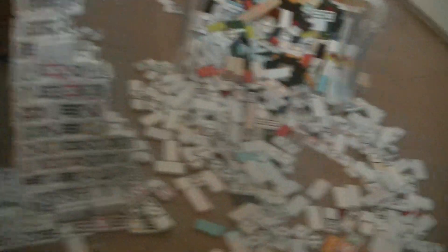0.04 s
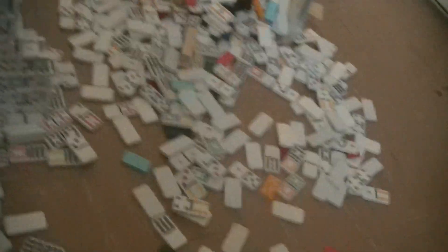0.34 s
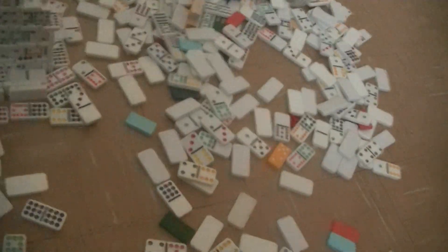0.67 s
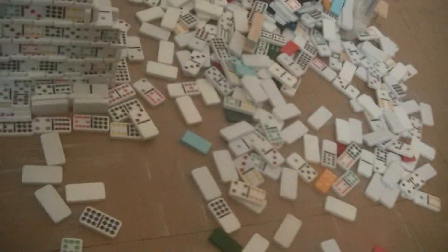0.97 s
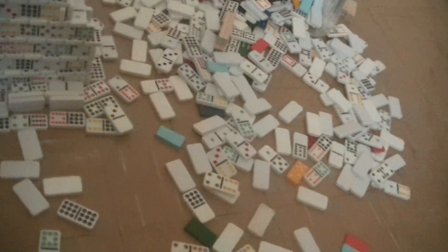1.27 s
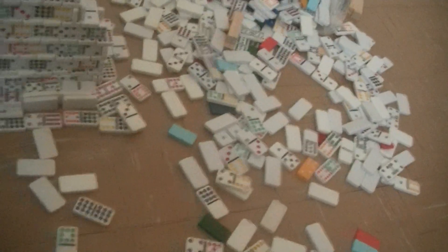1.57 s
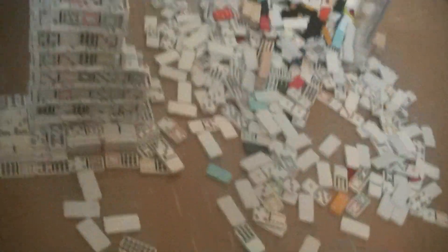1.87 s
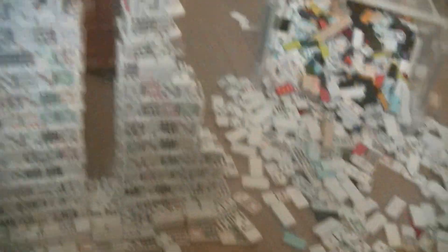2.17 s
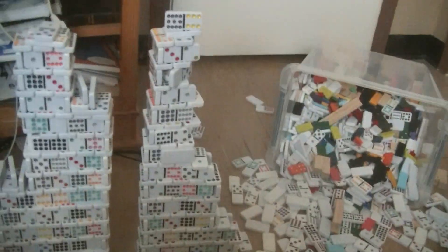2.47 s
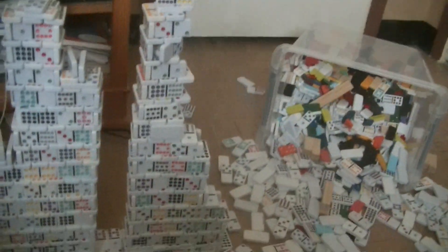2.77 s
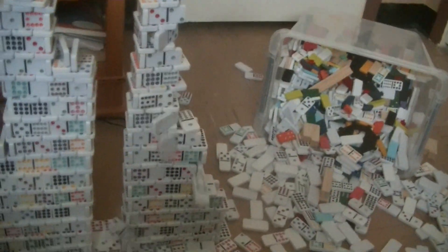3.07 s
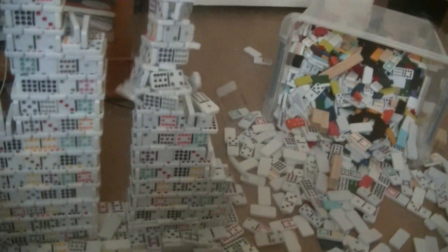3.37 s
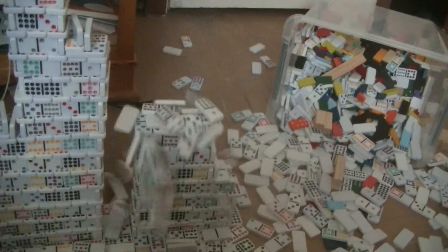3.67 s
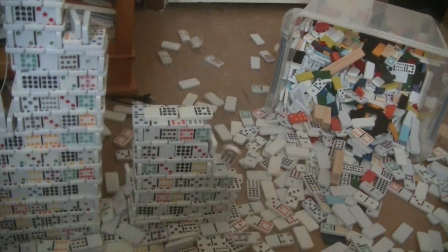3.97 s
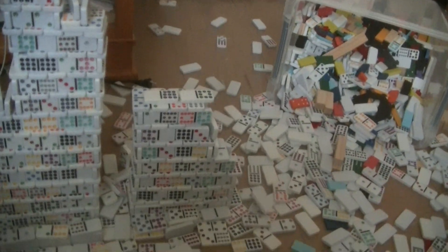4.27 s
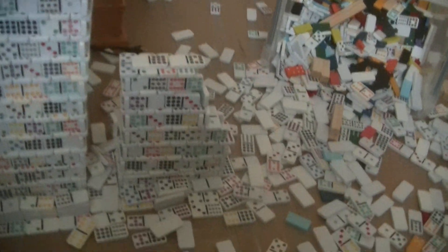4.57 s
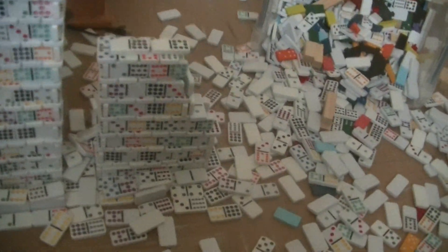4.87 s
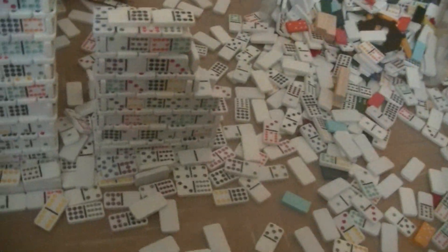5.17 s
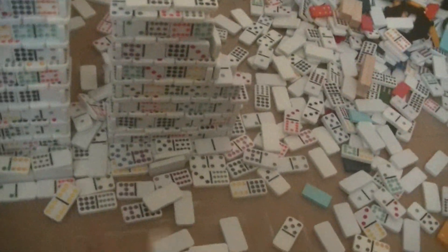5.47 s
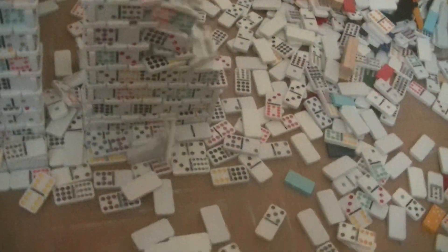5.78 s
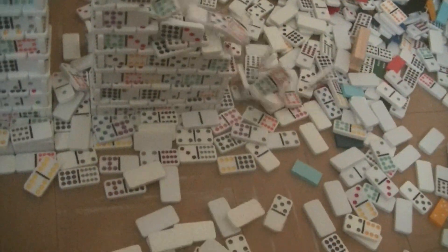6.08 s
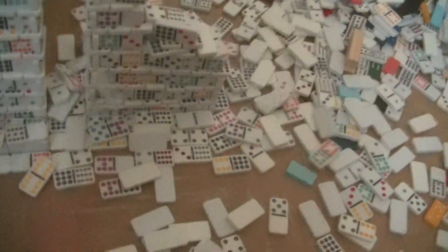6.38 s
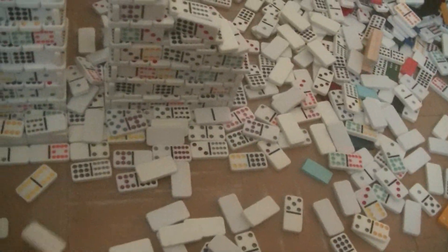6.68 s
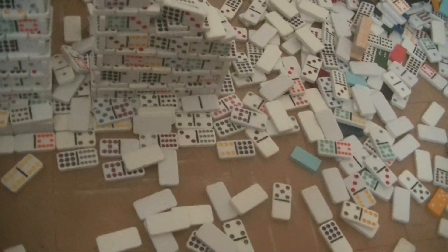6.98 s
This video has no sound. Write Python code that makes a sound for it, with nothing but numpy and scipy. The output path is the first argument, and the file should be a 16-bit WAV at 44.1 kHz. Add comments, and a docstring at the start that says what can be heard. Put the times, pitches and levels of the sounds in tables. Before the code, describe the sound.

Loose plastic dominoes drop and bounce on a wooden floor, each with a sharp clack and a thin ring, a few landing on something hollow. After a pause, a tower collapses in a dense clatter of colliding tiles. Faint taps and a short slide follow, then a sharp blow sets off a second collapse with a last small spill. The microphone is close and hand-held in a small, echoing room.

```python
"""Hard plastic dominoes fall on a wooden floor in a small, echoing room, close to a hand-held camera.
Loose tiles drop and bounce, each with a sharp clack and a thin ring; a few land on something hollow.
Then two towers give way, each in a dense clatter of colliding tiles; a blow sets the second humming first.
Faint dull taps and one short slide fall in the pauses, over quiet room air and soft thuds of a hand
on the camera. A limiter turns down the sharpest clacks."""
import sys
import numpy as np
from scipy import signal
from scipy.fft import rfft, irfft, next_fast_len
from scipy.io import wavfile
from scipy.ndimage import uniform_filter1d, minimum_filter1d

SR = 44100
rng = np.random.default_rng(int(sys.argv[2]) if len(sys.argv) > 2 else 0)


def master_out(mix):
    """Clip the mix to full scale and print it as 16-bit PCM to the path in sys.argv[1]."""
    frames = np.transpose(np.atleast_2d(mix))
    ceiling = np.clip(frames, -1, 1)
    pcm = np.round(ceiling * 32767).astype(np.int16)
    wavfile.write(sys.argv[1], SR, pcm)


N = 310464

# The tone of the quiet room. Each row: frequency in Hz, relative level in dB.
AIR_TONE = [(15, -38.5), (25, -18), (119, -6.5), (152, -8.5), (233, -2.5), (537, -12.5), (684, -20.5),
            (945, -16), (1140, -22), (1620, -15.5), (1750, -13.5), (7700, -14.5), (15500, -28)]
# How alike the air is in left and right. Each row: frequency in Hz, likeness (1 is identical).
AIR_LIKENESS = [(60, 0.14), (300, 0.18), (2000, 0.09), (8000, 0.21)]
# Faint dull taps. Each row: start in seconds, peak level in dB.
TAP_HITS = [(0.076, -39), (2.219, -37.5), (2.254, -46), (4.726, -35), (4.836, -35), (4.888, -45),
            (4.952, -30.5), (5.045, -36), (5.217, -27), (5.339, -39)]
# The tone of a tap. Each row: frequency in Hz, relative level in dB.
TAP_TONE = [(150, -9.5), (400, -29), (700, 0.5), (1100, -5), (2000, 2), (4800, 1), (7000, -27),
            (14000, -35)]
# How long the room echoes. Each row: frequency in Hz, seconds to fade by 60 dB.
ECHO_FADE = [(200, 0.28), (530, 0.42), (1400, 0.29), (3700, 0.34), (7000, 0.25), (13000, 0.24)]
# The echo's tone, where the room's low notes stand out. Each row: frequency in Hz, gain in dB.
ECHO_TONE = [(60, -8), (120, -1), (155, 7), (190, 3), (220, -2.5), (290, 5), (480, -3.5), (1000, -2.5),
             (2500, -2.5), (7000, -1.5), (14000, 1)]
# How alike the echo is in left and right. Each row: frequency in Hz, likeness (1 is identical).
ECHO_LIKENESS = [(60, 0.05), (130, 0.19), (290, 0.76), (640, 0.87), (1410, 1), (3100, 0.81), (6820, 0.71),
                 (15000, 0.72)]
# The hand shifts on the camera. Each row: start in seconds, relative level in dB.
HAND_BUMPS = [(0.2, -55.5), (1.82, -57), (2.19, -63)]
# The clearest tile strikes. Each row: start in seconds, level in dB, brightness in Hz,
# amount of floor knock (higher is boomier), relative echo level in dB.
TILE_STRIKES = [(.368, -4.5, 5060, 3, -2), (.463, -16.5, 5000, 15, 1.5), (.481, -11.5, 4660, 19, 2.5),
                (0.507, -11, 5470, 23, 0), (.525, 5.5, 4810, 16, -9), (0.535, 7.5, 4890, -3, -14),
                (0.5596, 1.5, 5360, -8, -9.5), (.591, -1, 5400, -13, -7), (.599, 7, 5040, 1, -7),
                (0.6379, -6.5, 5530, 8, 7), (0.7487, 4.5, 5050, 13, -6), (.8547, -6, 4500, 8, 3.5),
                (0.8624, -0.5, 5040, -8, -7), (.963, -6, 5740, 17, 5.5), (0.979, 0, 6080, 26.5, -18),
                (.994, 3, 5000, 18.5, -2), (1.035, 3, 6160, 6, -9.5), (1.041, -1, 6280, 15, -1),
                (1.125, -9, 4720, 11, -1), (1.1347, -2.5, 5780, 5, -9), (1.1395, 2.5, 6200, 7.5, 2.5),
                (1.256, -0.5, 5700, -6, 0), (1.2647, -2.5, 6500, 6.5, 4.5),
                (1.3426, -4.5, 5000, 13.5, -2.5), (1.441, 3, 3490, -13.5, -1.5),
                (1.468, -0.5, 5700, -10, 4.5), (1.515, -9, 4850, -14, -2), (1.5895, -14.5, 4880, -2, 3),
                (1.6471, -19, 4650, 18, 9), (2.8304, -15, 7080, -7, 5), (2.845, -10.5, 7180, -4, -4.5),
                (3.055, 10, 5080, -13, -10), (3.067, 3, 7230, -13, -1.5), (3.114, 1, 7280, -11, 0),
                (3.1968, 6, 4350, 0, -14), (3.2453, 7, 6930, 27, -14.5), (3.308, 5.5, 6350, -0.5, -3.5),
                (3.6193, 2, 4380, 14.5, 2), (3.657, 6.5, 5310, 8, -4), (3.7802, 7, 7000, -9, -9.5),
                (4.183, -3, 5400, 14.5, 5.5), (4.3645, -3.5, 6800, 7, -5), (4.38, 1, 6770, 5, -9),
                (4.406, -2.5, 6770, -7, -8.5), (4.4206, 4.5, 6980, -9, -13), (4.459, -11.5, 4700, -10, -10),
                (4.494, -14.5, 4600, -8, -13), (5.642, 10, 6000, 9, -6), (5.684, 3.5, 5350, -2, 0.5),
                (5.701, -2, 6700, -2, 0.5), (5.7578, 4.5, 5000, -9, 0), (5.8131, 12.5, 6500, 16, -22),
                (5.8417, 5.5, 4850, 10.5, -5.5), (5.927, 8.5, 5190, 5, -20.5), (5.937, 4, 6800, -2, -14),
                (5.975, 5, 4750, -14, -8.5), (6.0614, 8, 6690, 16, -14), (6.077, 11, 6720, -21, -13),
                (6.193, 11.5, 6820, -7, -15), (6.2784, 0, 6650, 21, 3), (6.327, 5.5, 4930, 7, -1),
                (6.493, 10, 5300, -13, -8), (6.579, 2.5, 4600, 3, 4.5), (6.6562, 6.5, 5050, 17, -9),
                (6.671, 5, 4900, -8, -4.5), (6.751, 11.5, 5600, 11, -6)]
# The basic tone of a clack. Each row: frequency in Hz, relative level in dB.
CLACK_TONE = [(59, -71.5), (100, -25.5), (188, -24.5), (487, -27), (758, -21.5), (1130, -22.5), (2370, -7),
              (3120, -6), (5070, 1.5), (6390, -2), (6810, -2.5), (7560, -9.5), (8410, -6.5), (10400, -20.5),
              (15500, -31)]
# Tiles land on something hollow. Each row: start in seconds, relative level in dB.
HOLLOW_HITS = [(1.302, -27.5), (1.342, -15.5), (1.44, -12.5), (1.47, -12), (1.515, -19.5), (1.589, -21.5),
               (1.632, -20), (1.648, -19.5)]
# The notes of that hollow space. Each row: pitch in Hz, width in Hz, relative level in dB.
HOLLOW_NOTES = [(1604, 165, 3), (1750, 141, 1)]
# Two towers fall, then a last short spill. Each row: start in seconds, seconds of pouring,
# seconds of running out, relative level in dB, typical ring pitch of the tiles in Hz.
FALLS = [(3.07, 1.06, .38, -13.5, 7050), (5.76, .72, .44, -15, 6800), (6.75, .11, .055, -13.5, 7620)]
# The tone of a sliding tile. Each row: frequency in Hz, relative level in dB.
SLIDE_TONE = [(350, -49), (600, -28), (1190, -30), (2800, -14), (3460, -18.5), (5070, -6.5), (7340, -24.5),
              (9060, -22), (14000, -61)]
# The notes of the struck stack. Each row: pitch in Hz, level in dB, seconds to fade by 60 dB.
STACK_NOTES = [(190, -47.5, 1.4), (1300, -39.5, 0.33), (15500, -36.5, .3)]
# The two microphones differ in level. Each row: frequency in Hz, left minus right in dB.
MIC_BALANCE = [(60, 4), (110, -1), (200, -2.5), (380, 0), (700, 0), (1290, 1), (2380, -0.5), (4400, 1),
               (8120, -7), (15000, 1)]
# Short waves reach them out of step. Each row: frequency in Hz, left minus right phase in radians.
MIC_PHASE = [(7000, 0.11), (9000, 1.13), (12000, 0.35), (15000, 2.3)]


def amp(db):
    """Turn decibels into a number to multiply by."""
    return 10 ** (np.asarray(db) / 20)


def unit(x):
    """Scale a sound to an average (rms) level of 1."""
    return x / np.sqrt(np.mean(x ** 2) + 1e-20)


def along(points, hz):
    """Read between the rows of a (frequency, value) table, with octaves evenly spaced."""
    freqs, values = np.transpose(points)
    return np.interp(np.log(hz + 1), np.log(freqs + 1), values)


def filtered(x, response):
    """Change a sound's tone: response(hz) gives the gain at each frequency."""
    n = x.shape[-1]
    padded = next_fast_len(n + SR // 10)
    return irfft(rfft(x, padded) * response(np.fft.rfftfreq(padded, 1 / SR)), padded)[..., :n]


def add(track, start_s, sound):
    """Mix a sound into a track at a given time."""
    start = max(round(start_s * SR), 0)
    part = track[start:start + len(sound)]
    part += sound[:len(part)]


def stereo_noise(n, likeness):
    """Noise at two microphones, as alike as the likeness table says."""
    angle = lambda hz: np.arccos(np.clip(along(likeness, hz), -1, 1)) / 2
    shares = lambda hz: np.array([np.cos(angle(hz)), np.sin(angle(hz))])
    mid, side = filtered(rng.standard_normal((2, n)), shares)
    return np.array([mid + side, mid - side])


def room_air(level_db=-58.5):
    """The quiet room makes a soft, steady hush."""
    noise = stereo_noise(N, AIR_LIKENESS)
    return amp(level_db) * unit(filtered(noise, lambda hz: amp(along(AIR_TONE, hz))))


def contact_pulses(tone_db, size=1024, swell_hz=5200, swell_width_hz=2400):
    """A contact makes a sudden pulse, here of peak 1, with the tone that tone_db(hz) gives."""
    hz = np.fft.rfftfreq(size, 1 / SR)
    # pack the energy at the front of the pulse without changing its tone (minimum phase)
    cepstrum = irfft(np.log(amp(np.maximum(tone_db(hz), -70))))
    cepstrum[..., 1:size // 2] *= 2
    cepstrum[..., size // 2 + 1:] = 0
    # the band near swell_hz lags a little, so a pulse swells over two or three cycles
    resonance = swell_hz ** 2 - hz ** 2 + 1j * hz * swell_width_hz
    wave = irfft(np.exp(rfft(cepstrum)) * np.conj(resonance) / resonance)
    return wave / np.abs(wave).max(-1, keepdims=True)


def dull_taps(rock_db=-7, rock_s=0.00262):
    """Soft contacts have little treble and no ring; the tile rocks once after each."""
    track = np.zeros(N)
    pulse = contact_pulses(lambda hz: along(TAP_TONE, hz))
    for start, db in TAP_HITS:
        add(track, start, amp(db) * pulse)
        add(track, start + rock_s * rng.uniform(0.33, 1), amp(db + rock_db) * pulse)
    return track


def room_echo(sound, tail_db=3, tail_rise_s=0.0035, near_db=-5, near_rise_s=0.00078, near_fade_s=0.013):
    """Sound from one spot scatters quickly off the floor and heaps, then lingers between the walls."""
    n = SR // 2
    t = np.arange(n) / SR
    hz, times, bands = signal.stft(stereo_noise(n, ECHO_LIKENESS), SR, nperseg=256)
    fade = amp(-60 * times / along(ECHO_FADE, hz)[:, None])
    tail = signal.istft(bands * fade, SR, nperseg=256)[1][:, :n]
    tail = unit(tail * (1 - np.exp(-t / tail_rise_s)))
    tail = filtered(tail, lambda hz: amp(along(ECHO_TONE, hz)))
    near_shape = amp(-60 * t / near_fade_s) * (1 - np.exp(-t / near_rise_s))
    near = unit(stereo_noise(n, ECHO_LIKENESS) * near_shape)
    response = (amp(tail_db) * tail + amp(near_db) * near) / np.sqrt(n)
    return signal.oaconvolve(sound[None], response, axes=1)[:, :N]


def hand_thuds(gain_db=-2.5, rise_s=.018, rumble_hz=65):
    """A shifting hand sends low, soft thuds through the camera's body."""
    loudness, t = np.zeros(N), np.arange(SR // 4) / SR
    for start, db in HAND_BUMPS:
        add(loudness, start, amp(db + gain_db) * t / rise_s * np.exp(1 - t / rise_s))
    rumble = filtered(rng.standard_normal((2, N)), lambda hz: hz / rumble_hz / (1 + (hz / rumble_hz) ** 4))
    return loudness * unit(rumble)


def tile_rings(pitch_hz, level_db, uneven_db=2, fade_s=0.2, jostle_hz=65, bend_db=-11, bend_fade_s=0.029):
    """Each struck tile rings thinly; its pitch wavers as it jostles its neighbours."""
    t = np.arange(SR // 10) / SR
    chance = rng.standard_normal((len(pitch_hz), 41))
    strength = amp(level_db + uneven_db * chance[:, 0])
    waver = jostle_hz * signal.resample(chance[:, 1:], len(t), axis=1)
    phase = 2 * np.pi * np.cumsum(pitch_hz[:, None] + waver, axis=1) / SR
    ring = amp(-60 * t / fade_s) * np.sin(phase)
    # the tile also bends like a loose bar, which gives a much lower note
    bend = amp(bend_db - 60 * t / bend_fade_s) * np.sin(phase / 2.5)
    return strength[:, None] * (ring + bend)


def clacks(bright_hz, knock_db, ring_hz, ring_db, tilt_db=9, uneven_db=2, rebound_s=.0013):
    """Each clack is a very short contact pulse, two quick rebounds and the ring of the freed tile."""
    chance = rng.standard_normal((len(bright_hz), 30))

    def tone_db(hz):
        # harder contacts are brighter, and the floor adds a low knock
        hardness = np.log2(bright_hz / 5200)[:, None]
        tilt = hardness * np.clip(np.log2((hz + 1) / 5200), -1.1, .45)
        knock = knock_db[:, None] / (1 + (hz / 1700) ** 4) * hz / (hz + 180)
        ripple = signal.resample(chance[:, 2:], len(hz), axis=1)  # each point of impact has its own tone
        bass_loss = 20 * np.log10(1 + (130 / (hz + 1)) ** 2)  # a tile is too small to give off bass
        return along(CLACK_TONE, hz) + tilt_db * tilt + knock + uneven_db * ripple - bass_loss

    waves = tile_rings(ring_hz, ring_db)
    # a corner lands first, then the edge and the face
    delays = np.cumsum(rebound_s * np.exp(.7 * chance[:, :2]), axis=1)
    for wave, pulse, (edge_s, face_s) in zip(waves, contact_pulses(tone_db), delays):
        add(wave, 0, pulse)
        add(wave, edge_s, amp(-10) * pulse)
        add(wave, face_s, -amp(-14) * pulse)
    return waves


def tile_strikes(lag_s=.001, ring_db=-25, free_ring_hz=6770, damping_db_per_hz=.012, spots=8):
    """Single tiles clack nearby. Gives the direct sound and what each spot sends into the room."""
    starts, db, bright_hz, knock, echo_db = np.transpose(TILE_STRIKES)
    # a bright strike rings freely; duller contacts damp the ring
    damping_db = damping_db_per_hz * np.maximum(free_ring_hz - bright_hz, 0)
    waves = clacks(bright_hz, knock_db=0.73 * knock, ring_hz=bright_hz, ring_db=ring_db - damping_db)
    direct, to_room = np.zeros(N), np.zeros((spots, N))
    for i, wave in enumerate(waves):
        add(direct, starts[i] + lag_s, amp(db[i]) * wave)
        add(to_room[i % spots], starts[i] + lag_s, amp(db[i] + echo_db[i]) * wave)
    return direct, to_room


def hollow_knocks(gain_db=-9, fade_s=0.027):
    """A landing tile chatters briefly and makes a small hollow space sound its notes."""
    def cavity(hz):
        return sum((-1) ** k * amp(db) * 1j * hz * width / (pitch ** 2 - hz ** 2 + 1j * hz * width)
                   for k, (pitch, width, db) in enumerate(HOLLOW_NOTES))

    track, t = np.zeros(N), np.arange(SR // 8) / SR
    for start, db in HOLLOW_HITS:
        chatter = rng.standard_normal(len(t)) * amp(-60 * t / fade_s)
        knock = filtered(chatter, cavity)
        add(track, start, amp(db + gain_db) * knock / np.abs(knock).max())
    return track


def tile_flow(swell_s=0.056, swell_db=7.5, gather_s=0.4, gather_db=2, run_out_db=12, thinning=.6):
    """A fall swells fast, grows as more layers come down, then runs out in fewer, weaker hits."""
    start, pour_s, run_out_s, db, _ = np.transpose(FALLS)
    t = np.arange(N) / SR
    fall = np.maximum(np.searchsorted(start, t) - 1, 0)  # which fall each sample belongs to
    age = t - start[fall]
    swelled = np.clip(age / swell_s, 0, 1)
    gathered = np.clip(age / np.minimum(gather_s, pour_s[fall] / 2), 0, 1)
    spent = np.clip((age - pour_s[fall]) / run_out_s[fall], 0, 1)
    force_db = db[fall] - swell_db * (1 - swelled) - gather_db * (1 - gathered) - run_out_db * spent
    rate = (age > 0) * (spent < 1) * (1 - thinning * spent)
    return fall, force_db, rate, spent


def falling_towers(hits=400, spots=8, gain_db=6.3, uneven_db=4.2, bright_hz=5650, dulling=.2):
    """Falling towers make hundreds of collisions, uneven in size and timing, spread over several spots."""
    fall, force_db, rate, spent = tile_flow()
    timing, hardness, knock, size, tile_set, detune = rng.standard_normal((hits, 6)).T
    # hits crowd together where the flow is fast
    fallen = np.cumsum(rate)
    progress = np.clip(np.arange(hits) + timing, .5, hits - .5) / hits
    at = np.searchsorted(fallen, fallen[-1] * progress)
    # about one tile in three comes from another set and rings further off pitch
    pitch_spread = np.where(tile_set > .5, .08, .024)
    ring_hz = np.transpose(FALLS)[-1][fall[at]] * np.exp(pitch_spread * detune)
    # the last, slow collisions are softer, so they sound duller
    clack_hz = bright_hz * np.exp(.24 * hardness) * (1 - dulling * spent[at])
    waves = clacks(clack_hz, knock_db=-2 + 4.5 * knock, ring_hz=ring_hz, ring_db=-24)
    gains = amp(force_db[at] + gain_db + uneven_db * np.minimum(size, 1.2))
    tracks = np.zeros((spots, N))
    for i in range(hits):
        add(tracks[i % spots], at[i] / SR, gains[i] * waves[i])
    return tracks


def tile_slide(start_s=5.04, rise_s=0.084, stop_s=0.13, level_db=-40.5, grit_db=4):
    """A tile slides over the floor: tiny, uneven catches blur into a swish that follows its speed."""
    noise = rng.standard_normal(N)
    roughness = unit(uniform_filter1d(rng.standard_normal(N), size=40))
    catches = noise * amp(grit_db * roughness)
    speed = np.interp(np.arange(N) / SR - start_s, [0, rise_s, rise_s + stop_s], [0, 1, 0])
    return amp(level_db) * speed * unit(filtered(catches, lambda hz: amp(along(SLIDE_TONE, hz))))


def stack_ring(start_s=5.643):
    """A blow sets the standing stack and the boards under it ringing, just before it falls."""
    track, t = np.zeros(N), np.arange(SR) / SR
    for hz, db, fade_s in STACK_NOTES:
        add(track, start_s, amp(db - 60 * t / fade_s) * np.sin(2 * np.pi * hz * t))
    return track


def microphones(hz):
    """The two microphones hear the tiles at different levels and out of step, half on each side."""
    half = np.array([[.5], [-.5]])
    return amp(along(MIC_BALANCE, hz) * half) * np.exp(1j * along(MIC_PHASE, hz) * half)


def scene():
    """Mix the tiles and their echoes with the room's air and the hand's thuds."""
    strikes, strikes_to_room = tile_strikes()
    clatter = falling_towers()
    knocks_and_slide = hollow_knocks() + tile_slide()
    taps = dull_taps()
    echoes = sum(room_echo(spot) for spot in amp(-3) * strikes_to_room + clatter)
    echoes += room_echo(amp(-5) * knocks_and_slide + taps)
    tiles = strikes + clatter.sum(0) + knocks_and_slide + taps + stack_ring() + echoes
    return filtered(tiles, microphones) + room_air() + hand_thuds()


def record(dry):
    """A fast limiter turns down the loudest clacks; then the very highest treble is cut off."""
    ceiling, window, top_hz = .97, round(.0011 * SR), 15900
    needed_gain = np.minimum(1, ceiling / (np.abs(dry).max(0) + 1e-9))
    smooth_gain = uniform_filter1d(minimum_filter1d(needed_gain, window), window)
    return filtered(dry * smooth_gain, lambda hz: hz < top_hz)


dry = scene()
out = record(dry)
master_out(out)
```